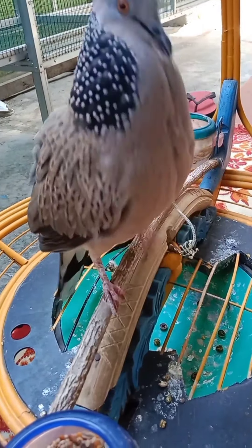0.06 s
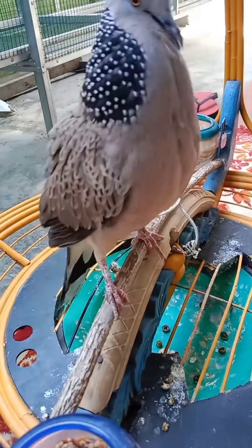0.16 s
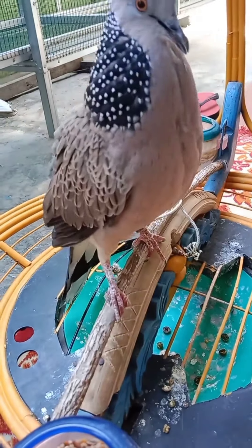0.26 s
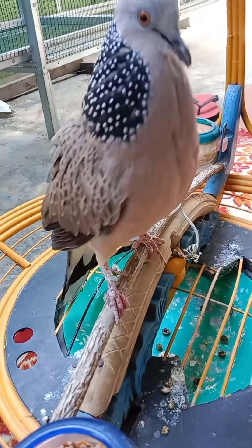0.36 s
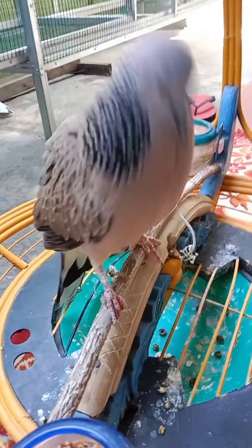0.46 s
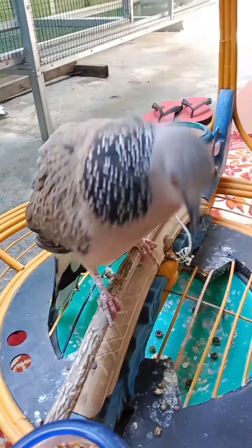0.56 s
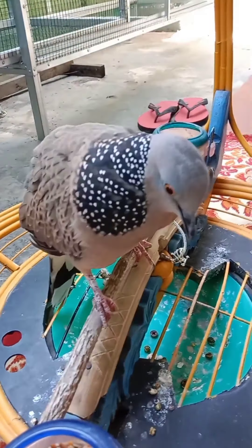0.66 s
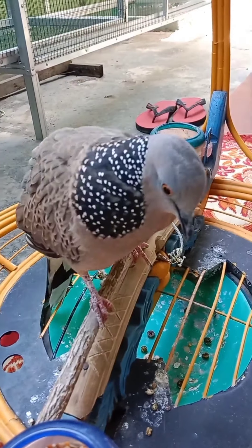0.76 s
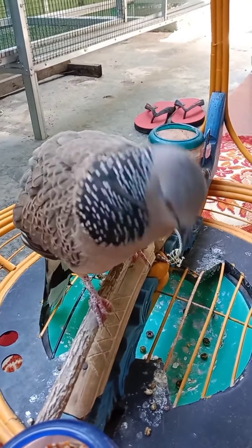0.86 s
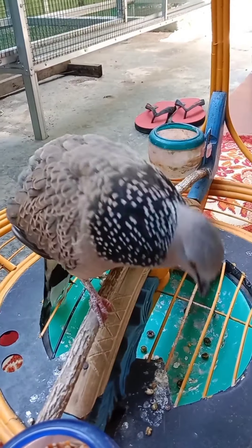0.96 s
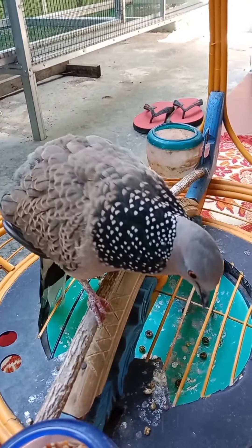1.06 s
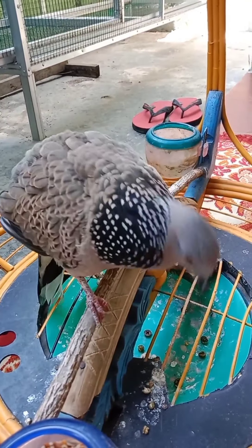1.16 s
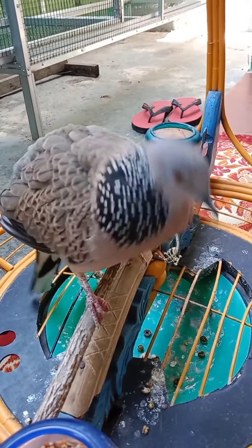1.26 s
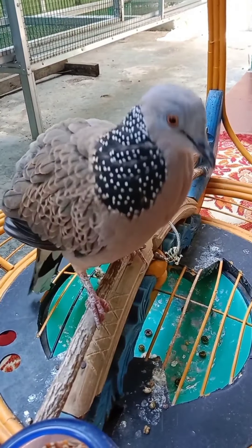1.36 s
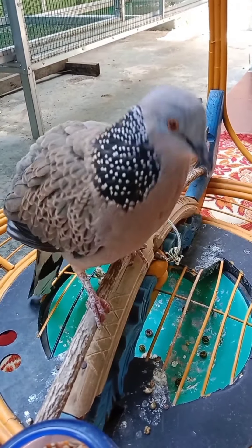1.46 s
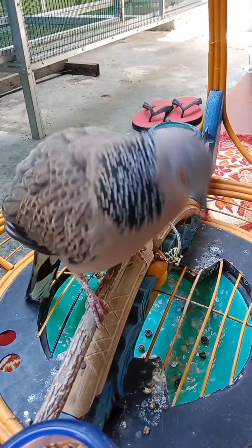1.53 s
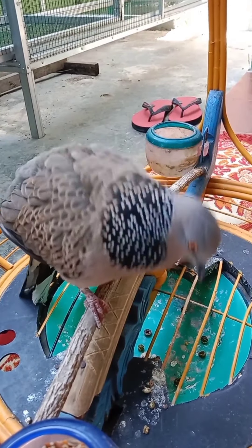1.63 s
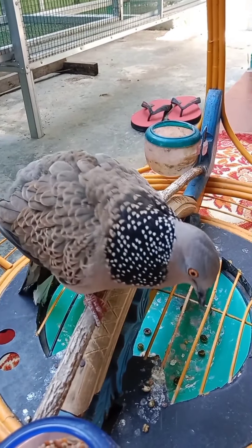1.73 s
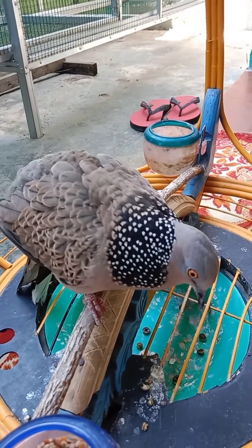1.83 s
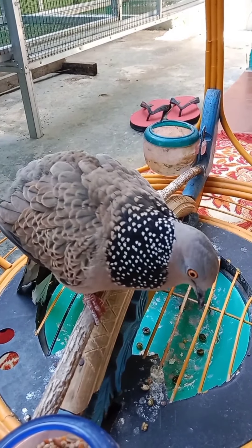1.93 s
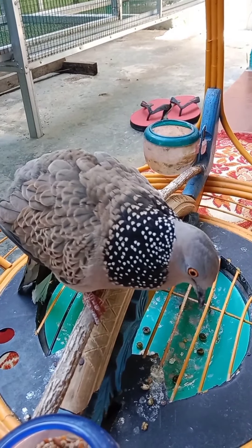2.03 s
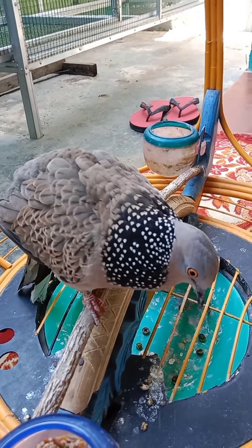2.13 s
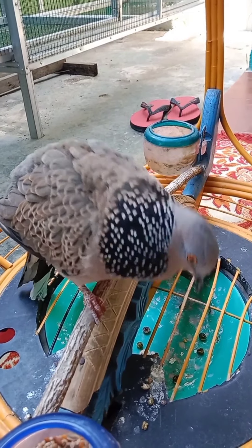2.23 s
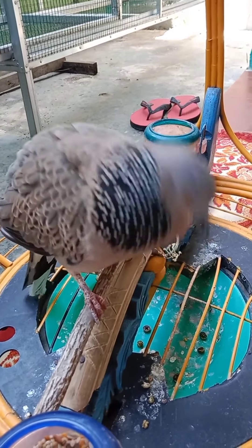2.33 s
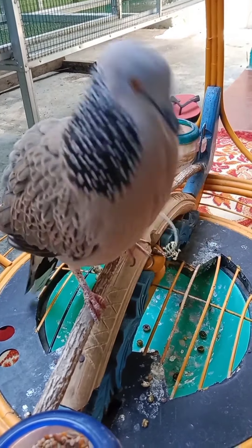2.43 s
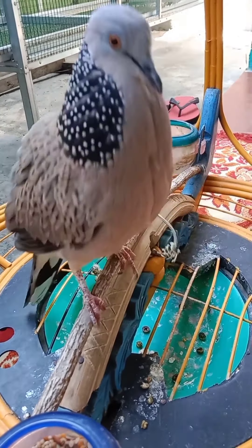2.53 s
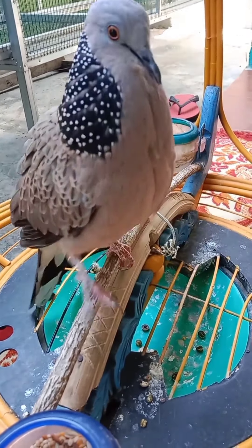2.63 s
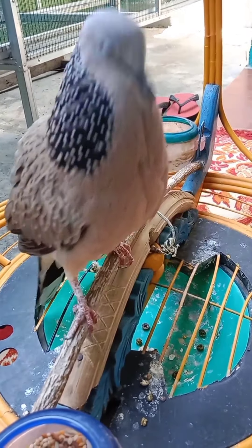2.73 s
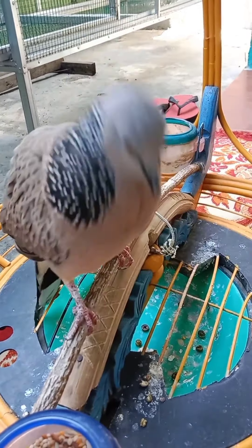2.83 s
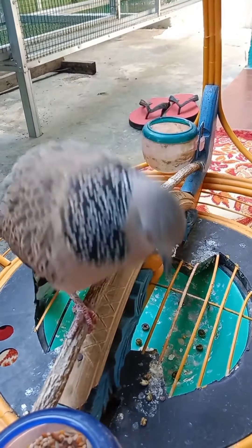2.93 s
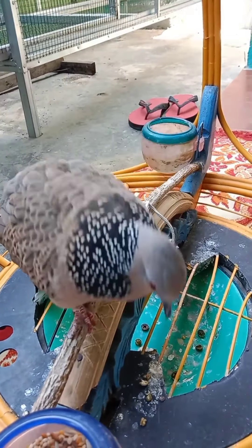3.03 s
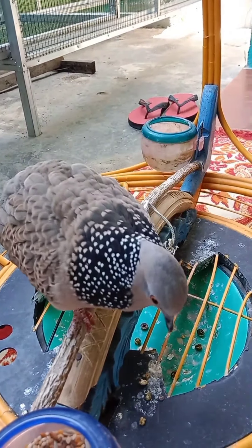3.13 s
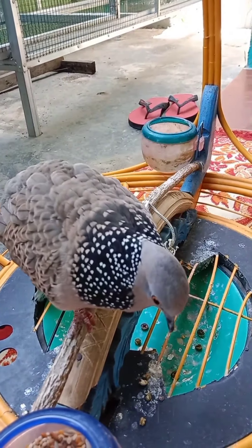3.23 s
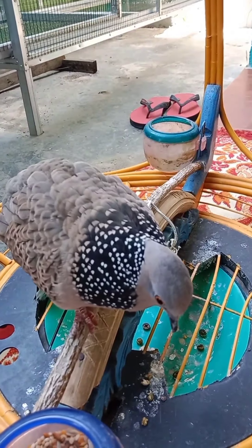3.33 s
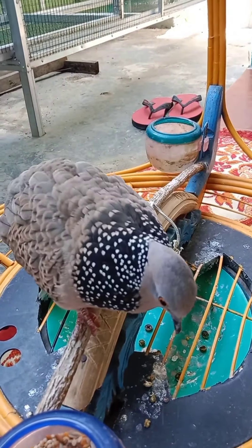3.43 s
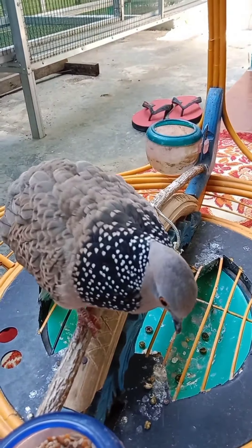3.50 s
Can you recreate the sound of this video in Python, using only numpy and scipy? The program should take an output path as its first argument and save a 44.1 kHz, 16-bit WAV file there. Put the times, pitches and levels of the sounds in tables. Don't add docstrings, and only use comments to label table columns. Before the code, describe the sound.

A dove close by coos in rough, fluttering short-long pairs around sharp finger-like snaps, with light scuffs and faint hum in a covered yard.

```python
import sys
import numpy as np
from scipy import signal
from scipy.fft import rfft, irfft
from scipy.io import wavfile
from scipy.ndimage import uniform_filter1d

SR = 44100
rng = np.random.default_rng(int(sys.argv[2]) if len(sys.argv) > 2 else 0)


def how_loud(loudness_db):
    steps = np.asarray(loudness_db, float) / 20
    return 10 ** steps


def store_wav(level_fs):
    pcm = np.round(np.clip(np.atleast_2d(level_fs), -1, 1) * 32767)
    wavfile.write(sys.argv[1], SR, pcm.T.astype(np.int16))


N = 338687

# start in seconds, effort in dB, top pitch in Hz,
# seconds until the effort lets go, air noise in dB.
SHORT_NOTES = [
    (1.69, -20, 693.5, 0.12, -19),
    (3.09, -17.5, 691, 0.13, -23),
    (4.92, -16, 658, 0.13, -32.5),
    (6.188, -17.5, 641, 0.13, -27),
    (7.451, -17.5, 646.7, .14, -26.5),
]
# start in seconds, top pitch in Hz, seconds until the steady top breaks,
# seconds until the breath ends, air noise in dB.
LONG_NOTES = [
    (-.41, 710, .24, 0.49, -29.5),
    (1.98, 706, 0.24, .5, -27),
    (3.375, 698.5, .355, .48, -25),
    (5.2, 683, .335, 0.4697, -44),
    (6.47, 695.8, 0.3, 0.46, -41),
]
# time in seconds, level in dB, pitch in Hz.
TIRING = [
    (.2, -2, 694.6),
    (.37, -8, 587.7),
    (.47, -11, 564),
]
# low edge in Hz, high edge in Hz, level in dB,
# flutter from 0 to 1.
THROAT_BANDS = [(1153, 1190, -21.5, 0), (1395, 1490, -39, 1)]
# time in seconds, peak in dB, upper ring in dB, top ring in dB, tail in dB.
SNAPS = [(2.582, -30, -4.5, -14, -24.5), (3.1724, -45, -2, -20, -24), (3.45, -21.5, -1.5, -23, -32),
         (3.5287, -58.5, 22, 7, -28.5), (3.8365, -23.5, -17.5, -25, -30),
         (4.0356, -38.5, -13, -23.5, -22.5), (4.245, -37, -29, -25.5, -28), (4.6351, -31, -14, -20.5, -23),
         (4.8385, -9.5, -17, -26, -33.5), (4.8913, -33, -6, -12, -19.5), (5.0243, -32, -15, -13, -27.5),
         (5.1906, -2.5, -18.5, -29.5, -29.5), (5.5849, -6, -21, -17.5, -28),
         (5.9444, -8.5, -22, -23, -31.5), (6.2622, -43.5, -9.5, -38, -22), (6.4398, -3.5, -12.5, -21, -34),
         (7.183, -32, -3, -9, -19), (7.3173, -46.5, -9.5, -13, -22), (7.3757, -45, -2, -7, -26)]
# pitch in Hz, level in dB, t60 in seconds.
SNAP_MODES = [
    [(2343, -13.5, 0.014), (2575, -3.5, 0.0056), (2842, -6.5, 0.0088), (3370, -8, 0.0083),
     (4592, -13.5, 0.0028)],
    [(6200, -2.5, 0.0087), (6684, 0, 0.0093), (8070, 5.5, 0.0038)],
    [(9800, -5, 0.0097), (11700, 9, 0.0028), (14230, -1, 0.0046), (15400, 6, 0.004)],
]
# start in seconds, level in dB.
BRUSHES = [
    (6.068, -41),
    (6.572, -34),
]
# start in seconds, peak in dB, upper band in dB, top band in dB, t60 in seconds.
SCUFFS = [(0.0459, -26, -7, -31, 0.24), (1.0277, -63, 0, -12, 0.69), (1.0987, -67, 0, -11, 0.41),
          (2.2842, -30, -3, -16.5, 0.35), (3.2211, -60.5, -2.5, -22.5, 0.25),
          (3.9775, -50, -12.5, -43, 0.099), (4.5164, -36.5, -9.5, -23, 0.2), (4.605, -51.5, -9.5, -9, 0.13),
          (4.6793, -55.5, -35, -17, 0.073), (4.7832, -52, -14.5, -12, 0.82),
          (5.7927, -27.5, -11.5, -23, 0.28), (5.849, -44, -27, -8.5, 0.21), (6.0736, -56.5, 9.5, 5, 0.19),
          (6.5764, -50, 7.5, 9, 0.13), (7.0818, -56, -37, -24.5, 0.17)]
# start in seconds, peak in dB, upper band in dB, top band in dB.
RUSTLES = [(0.2169, -63.5, -3, -1), (0.2604, -64, -1.5, 1), (0.9494, -66.5, 6.5, -21.5),
           (1.1578, -60.5, -23, -33), (1.7135, -58.5, 5.5, -0.5), (1.7994, -62, 10, -25.5),
           (2.5594, -63, -7, 6), (2.6524, -57, -8, -17), (2.7194, -63, 13.5, 3), (2.9094, -76.5, 12.5, 16),
           (3.4384, -66.5, 12, 5.5), (3.4994, -64.5, 21, 10), (3.5994, -66, 18, -18.5),
           (3.6396, -54.5, 10, -25.5), (3.8254, -63, 15, -1), (4.0342, -66.5, 7, -5), (4.2194, -70, 8, 3.5),
           (5.3394, -59.5, 6, 5.5), (6.1894, -59, -7.5, 1), (6.4154, -55.5, 6, 4), (7.2963, -61, 3, -11.5)]
# low edge in Hz, high edge in Hz.
SCUFF_BANDS = [(2650, 4400), (5300, 8000), (10800, 15550), (1150, 2500), (3800, 7000)]
# time in seconds, peak in dB.
KNOCKS = [
    (2.166, -40),
    (4.625, -49.5),
    (5.565, -43),
    (6.706, -39.5),
]
# time in seconds, level in dB, pitch in Hz, throbs per second.
CRICKET = [
    (2.42, -68, 5180, 8.2),
    (2.448, -47.5, 5230, 17.8),
    (2.46, -50.5, 5205, 16.5),
    (2.732, -48, 5314, 17.8),
    (2.814, -54.5, 5260, 17.9),
    (3.102, -47.5, 5270, 15),
    (3.28, -76.5, 5250, 17),
]
# start in seconds, length in seconds, pitch
# in Hz, level in dB.
FAINT_TONES = [(.08, .18, 1500, -58), (2.3, .12, 1390, -56), (2.37, .1, 1470, -58), (2.32, .11, 2300, -58),
               (2.36, .15, 1760, -60), (6.58, .05, 2300, -58), (6.075, .05, 2450, -63), (.47, .08, 1507, -69),
               (1.125, 0.14, 1250, -68), (1.14, 0.097, 1526, -64), (1.32, 0.042, 900, -69),
               (1.57, 0.029, 860, -68), (4.02, .04, 803, -63), (4.4, 0.041, 803, -62), (1.331, 0.12, 439, -66.5),
               (2.448, 0.14, 2800, -64.5), (2.6, .1, 1557, -62.5), (2.617, 0.18, 1990, -62),
               (2.851, .24, 1960, -62.5), (2.72, 0.17, 2646, -65.5), (3.207, 0.13, 286, -46.5),
               (4.166, 0.33, 437, -63.5), (5.414, 0.077, 2800, -60.5), (5.63, 0.19, 2660, -64.5),
               (5.795, 0.084, 268, -53.5), (7.47, .07, 6600, -64), (7.454, 0.096, 5010, -65.5),
               (7.597, 0.027, 7780, -63)]
# frequency in Hz, level in dB per Hz.
YARD_SPECTRUM = [(25, -25.5), (55, -8), (95, -5.5), (260, -13), (500, -24), (1000, -25), (1600, -25),
                 (2200, -29.5), (4200, -37.5), (5500, -33), (8000, -39), (8800, -46.5), (15300, -49.5),
                 (15700, -76)]
# centre in Hz, width in Hz, level in dB.
HUM_LINES = [(97, 23, 1.5), (145, 14, -2.5), (203, 8.6, -13.5), (320, 5.5, -18.5)]
# start in seconds, end in seconds.
DROPOUT = (4.552, 4.594)

ATTACK_S, ATTACK_DB, START_HZ, JUMP_S = 0.034, -40.5, 599.6, 0.05
FLUTTER_START, FLUTTER_CALM, FLUTTER_LATE, FLUTTER_END, CALM_S = .85, .3, .62, .2, .04
WHISTLE_HZ, WHISTLE_SINK_HZ_PER_S, WHISTLE_DB, WHISTLE_FADE_DB_PER_S = 6980, 1900, -64, 55
SHORT_HELD_HZ, SHORT_REST_HZ, SHORT_SINK_S, SHORT_S = 640.5, 585, 0.044, .285
SHORT_FADE_DB_PER_S, SHORT_FLAP_HZ = 210.5, 95.55
LONG_DB, SWELL_DB, CLIMB, TOP_S, SAG_HZ_PER_S, LONG_FLAP_HZ = -15, -2, .07, .21, 190, 118.4
BREAK_S, BREAK_DB = 0.011, -5
RELEASE_DB_PER_S, SLOWER_PER_S = 641, 8550
CALM_AIR_DB, LOW_AIR_DB = -13.5, -12
BRUSH_LO_HZ, BRUSH_HI_HZ, BRUSH_RISE_S, BRUSH_HOLD_S, BRUSH_FADE_DB_PER_S = 2800, 4360, 0.0085, .05, 330.5
SCUFF_RISE_S, RUSTLE_RISE_S, RUSTLE_T60_S = .016, .013, 0.23
HUM_DB, HUM_FOLLOWS, HISS_DB, HISS_FOLLOWS = -70.5, .25, -68.5, 0.19
OPEN_FROM_DB, CLOSE_DB_PER_S = -66.5, 158.5


def evened(x):
    return x / np.sqrt(np.mean(abs(x) ** 2) + 1e-20)


def add(mix, s, sound):
    part = mix[round(s * SR):][:len(sound)]
    part += sound[:len(part)]


def curve(rows, t):
    s, *columns = np.transpose(rows)
    return [np.interp(t, s, c) for c in columns]


def phase(hz):
    return 2 * np.pi * np.cumsum(hz) / SR


def coloured(count, points):
    hz = np.fft.rfftfreq(count, 1 / SR)
    f, db = np.transpose(points)
    colour = how_loud(np.interp(np.log(hz + 1), np.log(f), db))
    return evened(irfft(rfft(rng.standard_normal(count)) * colour, count))


def drift(count, hz):
    b, a = signal.butter(3, hz, fs=SR)
    return evened(signal.lfilter(b, a, rng.standard_normal(count + 4000))[4000:])


def band(x, lo_hz, hi_hz):
    return signal.sosfilt(signal.butter(3, [lo_hz, hi_hz], "band", fs=SR, output="sos"), x)


def flutter(count, depth, flap_hz, unsteady):
    flap = phase(flap_hz * (1 + .22 * drift(count, 20)))
    halving = np.clip(unsteady + .35 * drift(count, 14), 0, 1.4)
    shake = depth * (.75 * np.exp(1j * flap) + .18 * np.exp(-1j * flap))
    shake += halving * (.95 * np.exp(1j * (flap / 2 + 1.2)) + .3 * np.exp(-1j * flap / 2))
    shake += .33 * (drift(count, 45) + 1j * drift(count, 45))
    body = 1 + depth * shake
    body *= np.tanh(abs(body) / 2.8) / (abs(body) + 1e-9)
    return body / np.sqrt(uniform_filter1d(abs(body) ** 2, size=2600))


def coo(t, effort_db, hz, rasp_db, depth, flap_hz, whistle_db, whistle_hz, unsteady):
    count = len(t)
    note = phase(hz * (1 + .01 * drift(count, 44)))
    body = flutter(count, depth, flap_hz, unsteady)
    tone = band(np.sqrt(2) * (body * np.exp(1j * note)).real, 455, 870)
    puffs = rng.standard_normal(count) * abs(body)
    rasp = evened(band(band(puffs, 800, 1180), 400, 1250))
    overtone = np.zeros(count)
    for lo_hz, hi_hz, db, mix in THROAT_BANDS:
        octave = ((1 - mix + mix * body ** 2) * np.exp(2j * note)).real
        overtone += how_loud(db) * band(octave, lo_hz, hi_hz)
    whistle = abs(body) ** 2 * np.cos(phase(whistle_hz + 0 * t))
    chest = evened(band(rng.standard_normal(count) * abs(body), 403.7, 530))
    chest_db = -14 + .6 * rasp_db - (hz - 570) / 13
    voice = tone + how_loud(chest_db) * chest + how_loud(rasp_db) * rasp + overtone + how_loud(whistle_db) * whistle
    return t[0], how_loud(effort_db) * voice * signal.windows.tukey(count, .03)


def attack_db(t):
    return ATTACK_DB * np.clip(1 - t / ATTACK_S, 0, 2) ** 2


def short_note(start, effort_db, top_hz, let_go, air_db):
    t = np.arange(-.012, SHORT_S, 1 / SR)
    db = effort_db + attack_db(t) - SHORT_FADE_DB_PER_S * np.maximum(t - let_go - .01, 0)
    hz = np.interp(t, [0, JUMP_S, let_go, let_go + SHORT_SINK_S],
                   [START_HZ, top_hz, SHORT_HELD_HZ, SHORT_REST_HZ])
    depth = np.interp(t, [0, SHORT_S], [FLUTTER_START, FLUTTER_LATE])
    return coo(start + t, db, hz, air_db, depth, SHORT_FLAP_HZ, -75, WHISTLE_HZ, .85)


def long_note(start, top_hz, breaks, end, air_db):
    t = np.arange(max(-.012, -start), end + .17, 1 / SR)
    broken = np.clip((t - breaks) / BREAK_S, 0, 1)
    tired_db, tired_hz = curve(TIRING, t)
    release = RELEASE_DB_PER_S - SLOWER_PER_S * (end - .455)
    swell_db = np.interp(t, [0, TOP_S], [SWELL_DB, 0])
    db = LONG_DB + attack_db(t) + (1 - broken) * swell_db + broken * tired_db
    db += BREAK_DB * np.exp(-((t - breaks - BREAK_S) / BREAK_S) ** 2)
    db -= release * np.maximum(t - end, 0)
    hz = np.interp(t, [0, JUMP_S, TOP_S], [START_HZ, (1 - CLIMB) * top_hz, top_hz])
    hz -= SAG_HZ_PER_S * how_loud(0.37 * (air_db + 42)) * np.maximum(t - TOP_S, 0)
    hz += np.clip((t - breaks) / .04, 0, 1) * (tired_hz - hz)
    calm = np.exp(-((t - breaks + CALM_S) / CALM_S) ** 4)
    depth = np.interp(t, [0, breaks, end, end + .06], [FLUTTER_START, .7, FLUTTER_LATE, FLUTTER_END])
    depth += (FLUTTER_CALM - depth) * calm
    low = np.clip((t - .3) / 0.12, 0, 1)
    rasp_db = air_db + (LOW_AIR_DB - air_db) * .45 * low + CALM_AIR_DB * calm
    whistle_db = WHISTLE_DB - air_db / 2 - WHISTLE_FADE_DB_PER_S * abs(t - .08) + attack_db(t - .03)
    whistle_hz = WHISTLE_HZ - WHISTLE_SINK_HZ_PER_S * t
    unsteady = np.clip((air_db + 120) / 90, 0, 1.1)
    return coo(start + t, db, hz, rasp_db, depth, LONG_FLAP_HZ, whistle_db, whistle_hz, unsteady)


def snap(s, db, upper_db, top_db, tail_db):
    t = np.arange(5000) / SR
    ring = np.zeros(len(t))
    for group, group_db in zip(SNAP_MODES, (0, upper_db, top_db)):
        for hz, mode_db, t60 in group:
            tuned_hz = hz * rng.uniform(0.9, 0.99)
            ring += how_loud(group_db + mode_db - 60 * t / t60) * np.sin(2 * np.pi * tuned_hz * t)
    ring *= 1 - np.exp(-t / 0.00038)
    ring = band(ring, 1300, 16500)
    ring /= abs(ring).max()
    echo = rng.standard_normal(len(t)) * how_loud(-60 * t / .13)
    echo *= np.clip(t / .004, 0, 1) * np.clip((.1 - t) / .06, 0, 1)
    tail = signal.oaconvolve(echo, ring[:400])[:len(t)]
    tail *= how_loud(tail_db) / np.std(tail[200:1000])
    slip = tail[700:0:-1] * np.linspace(0, 1, num=700) ** 5.7 * how_loud(-3.5)
    return s + .0004 - 700 / SR, how_loud(db) * np.concatenate([slip, ring + tail])


def brush(s, db):
    t = np.arange(9000) / SR
    hz = np.fft.rfftfreq(len(t), 1 / SR)
    streaks = how_loud(5 * evened(uniform_filter1d(rng.standard_normal(len(hz)), size=20)))
    air = rfft(rng.standard_normal(len(t))) * streaks * (hz > BRUSH_LO_HZ) * (hz < BRUSH_HI_HZ)
    low = irfft(air * (hz < 3600), len(t))
    high = irfft(air * (hz >= 3600), len(t))
    fade_db = -BRUSH_FADE_DB_PER_S * np.maximum(t - BRUSH_HOLD_S, 0)
    shape = how_loud(db - 60 * t) * np.minimum(t / BRUSH_RISE_S, 1) ** 2
    return s, shape * (how_loud(fade_db) * low + how_loud(4.2 * fade_db) * high) / np.std(low + high)


def scuff(s, db, upper_db, top_db, rise, t60):
    count = 12000
    t = np.arange(count) / SR
    hz = np.fft.rfftfreq(count, 1 / SR)
    streaks_db = 4.6 * evened(uniform_filter1d(rng.standard_normal(count // 2 + 1), size=30))
    air = rfft(rng.standard_normal(count)) * how_loud(streaks_db)
    parts = []
    for lo, hi in SCUFF_BANDS:
        passed = np.tanh((hz - lo) / lo * 14) - np.tanh((hz - hi) / hi * 14)
        parts.append(evened(irfft(air * passed, count)))
    body, upper, top, dull, wide = parts
    shape = np.clip(t / rise, 0, 1) ** 2 * how_loud(-60 * np.maximum(t - rise, 0) / t60)
    spill = how_loud(min(upper_db, 0) - 3.5) * wide
    spill += how_loud(min(upper_db, 0) - 10) * dull * np.clip(t / 0.045, 0, 1)
    puff = body + how_loud(upper_db) * upper + how_loud(top_db) * top + spill
    return s - .006, how_loud(db - 6) * shape * puff * how_loud(2.5 * drift(count, 90))


def knock(s, db):
    t = np.arange(1500) / SR
    return s, how_loud(db) * (np.sin(2 * np.pi * 210 * t) * np.exp(-t / .004) + .3 * np.exp(-t / .0003))


def cricket():
    t = np.arange(CRICKET[0][0], CRICKET[-1][0], 1 / SR)
    db, hz, throbs = curve(CRICKET, t)
    stroke = phase(throbs) + 2 * np.pi * 0.19
    throb = (1 - .6 * np.cos(stroke)) * (1 + .4 * drift(len(t), 120))
    hz = hz * (1 - .006 * np.sin(stroke))
    turn = phase(hz * (1 + .008 * drift(len(t), 150)))
    return t[0], how_loud(db) * evened(throb * (np.cos(turn) + how_loud(-33) * np.cos(2 * turn)))


def faint_tone(s, length, hz, db):
    count = round(length * SR)
    turn = phase(hz + (8 + hz / 150) * drift(count, 50))
    return s, how_loud(db + 3.5 * drift(count, 40)) * np.cos(turn) * signal.windows.tukey(count, .6)


def patchy(shape, bins, frames):
    blotches = uniform_filter1d(rng.standard_normal(shape), size=bins, axis=0)
    return evened(uniform_filter1d(blotches, size=frames, axis=1))


def yard(opened_db):
    lines = np.zeros(N)
    for f, w, db in HUM_LINES:
        lines += how_loud(db) * evened(band(rng.standard_normal(N), f - w / 2, f + w / 2))
    wide = coloured(N, YARD_SPECTRUM)
    rumble = how_loud(-1.5 + 4.5 * drift(N, 9)) * evened(band(wide, 18, 350))
    hum = evened(lines + rumble)
    z = signal.stft(band(wide, 460, 16000), SR, nperseg=512)[2]
    patches = patchy(z.shape, 3, 16) + .9 * patchy(z.shape, 45, 10)
    hiss = signal.istft(z * how_loud(3.6 * patches), SR, nperseg=512)[1][:N]
    hiss /= np.std(band(hiss, 1000, 15000))
    hum_db = HUM_DB + HUM_FOLLOWS * opened_db
    hiss_db = HISS_DB + HISS_FOLLOWS * opened_db - 7.5
    return how_loud(hum_db) * hum + how_loud(hiss_db) * hiss


def walls_echo(dove):
    t = np.arange(6000) / SR
    walls = rng.standard_normal(len(t)) * how_loud(-60 * t / .14) * (t > .004)
    return signal.oaconvolve(dove, walls / np.linalg.norm(walls))[:N]


def suppression_opening(heard):
    loud_db = 10 * np.log10(abs(uniform_filter1d(heard ** 2, size=2000)) + 1e-12)
    closing = CLOSE_DB_PER_S * np.arange(N) / SR
    held_db = np.maximum.accumulate(loud_db + closing) - closing
    return uniform_filter1d(np.maximum(held_db - OPEN_FROM_DB, 0), size=3000)


def scene():
    dove, near = np.zeros(N), np.zeros(N)
    for source, table in ((short_note, SHORT_NOTES), (long_note, LONG_NOTES)):
        for row in table:
            add(dove, *source(*row))
    for source, table in ((snap, SNAPS), (brush, BRUSHES), (knock, KNOCKS), (faint_tone, FAINT_TONES)):
        for row in table:
            add(near, *source(*row))
    for s, db, upper_db, top_db, t60 in SCUFFS:
        add(near, *scuff(s, db, upper_db, top_db, SCUFF_RISE_S, t60))
    for row in RUSTLES:
        add(near, *scuff(*row, RUSTLE_RISE_S, RUSTLE_T60_S))
    add(near, *cricket())
    heard = dove + how_loud(-13) * walls_echo(dove) + near
    return (heard + yard(suppression_opening(heard)))[None]


def roll_off(x):
    return signal.sosfilt(signal.butter(12, 16640, fs=SR, output="sos"), x)


def record(dry):
    t = np.arange(N) / SR
    open_gain = np.clip(np.maximum((DROPOUT[0] - t) / .001, (t - DROPOUT[1]) / .02), 0, 1)
    b, a = signal.iirpeak(14900, 5.5, fs=SR)
    dry = dry + 1.3 * signal.lfilter(b, a, dry)
    dry = signal.oaconvolve(dry, signal.firwin(101, 15900, fs=SR)[None], "same")
    return roll_off(dry * open_gain)


dry = scene()
out = record(dry)
store_wav(out)
```